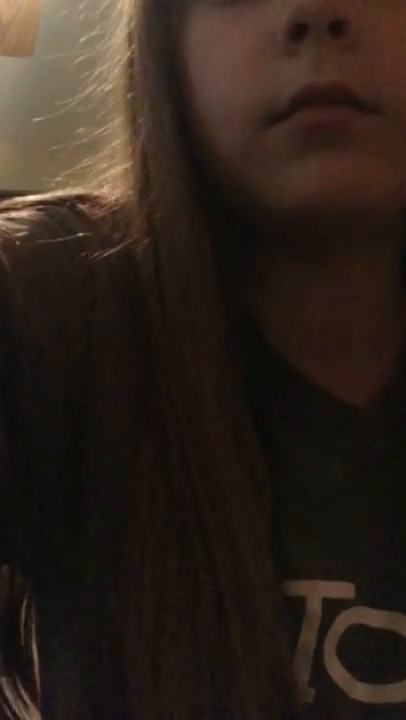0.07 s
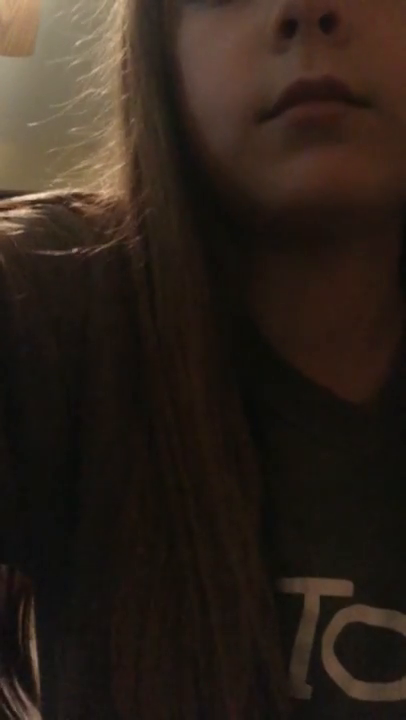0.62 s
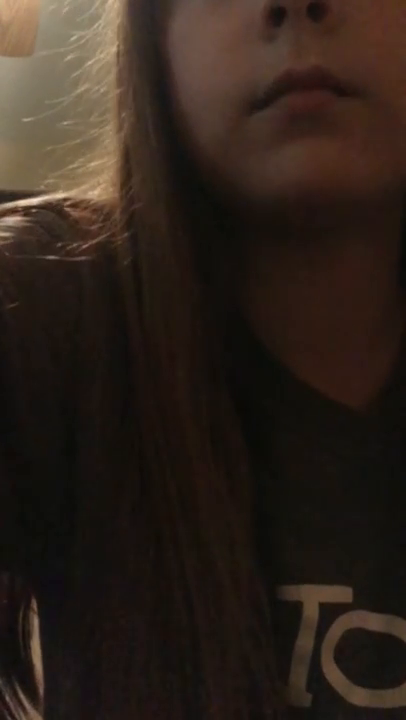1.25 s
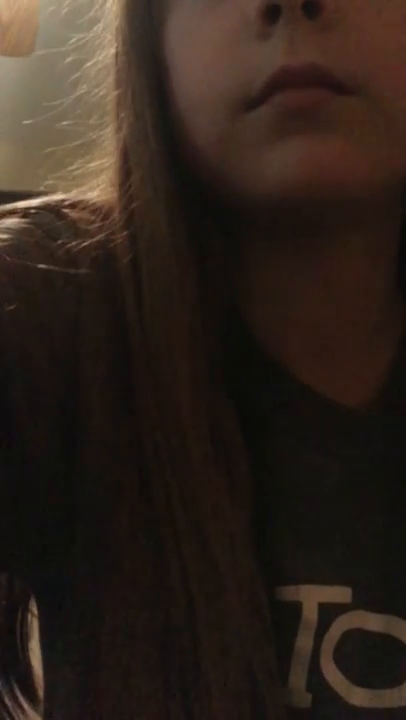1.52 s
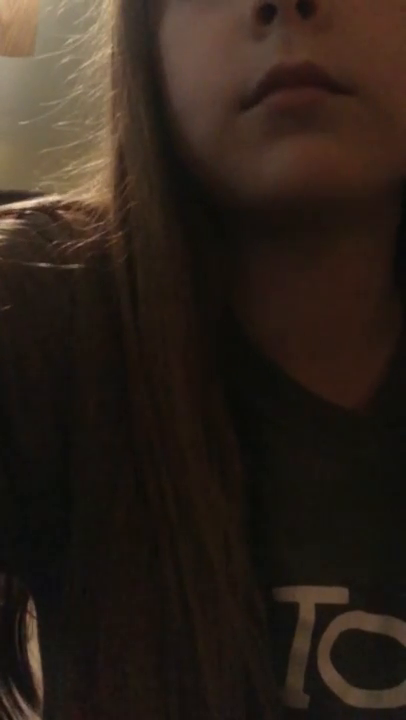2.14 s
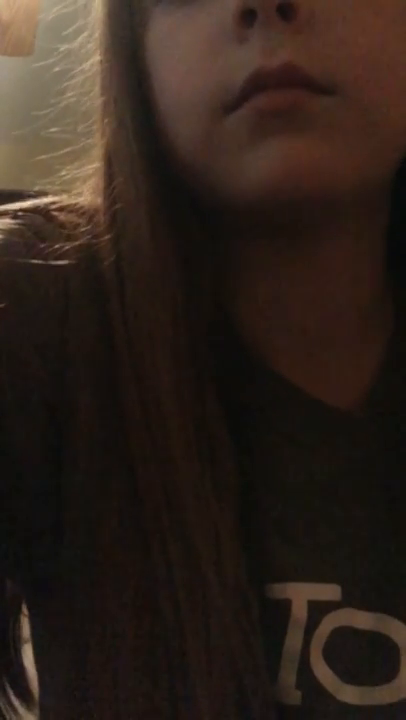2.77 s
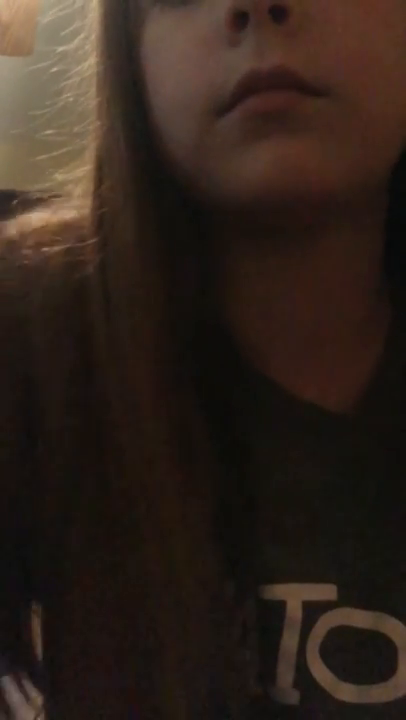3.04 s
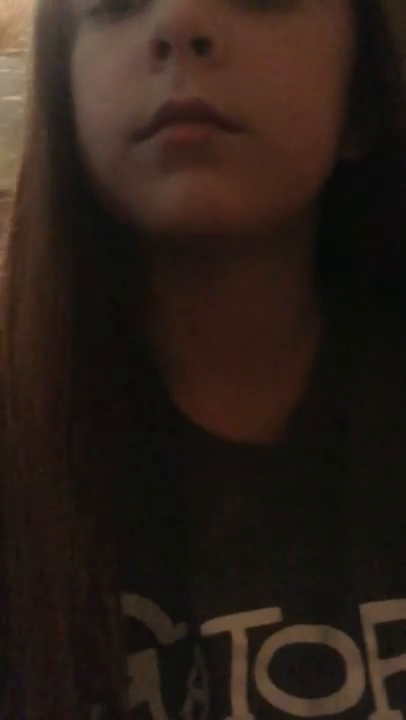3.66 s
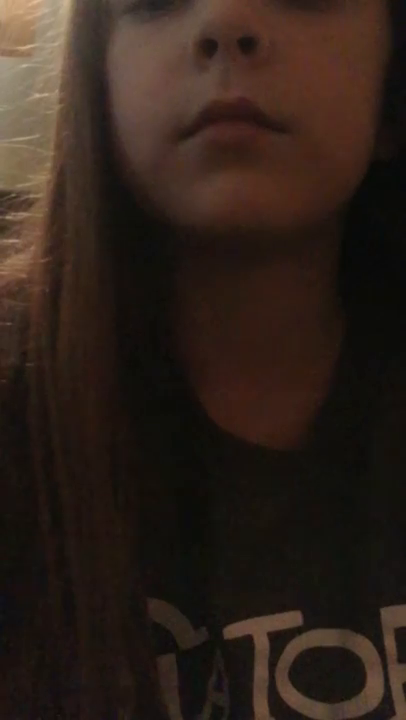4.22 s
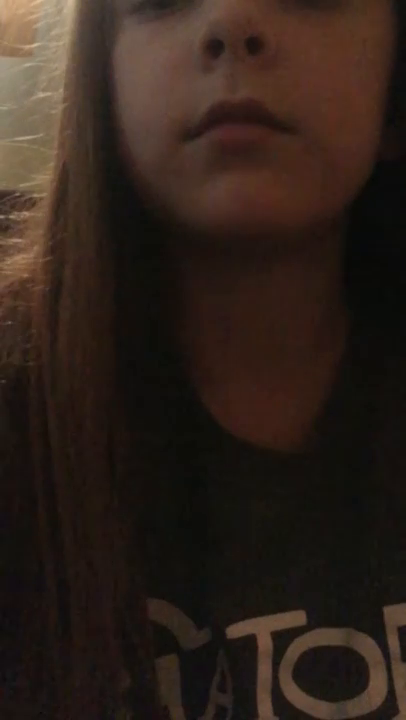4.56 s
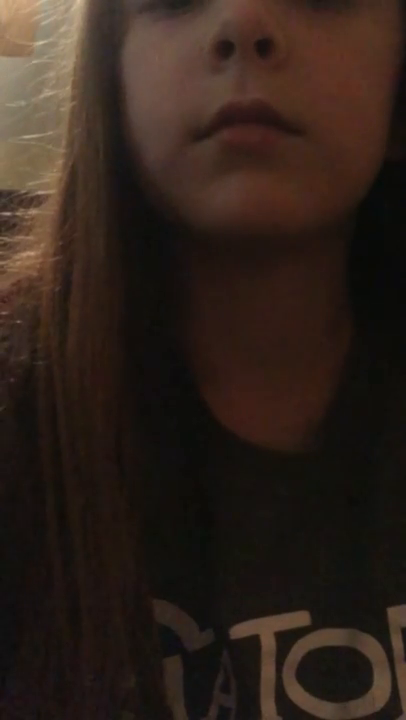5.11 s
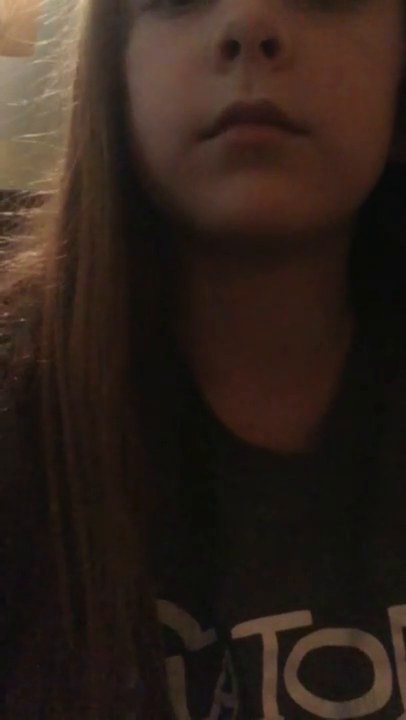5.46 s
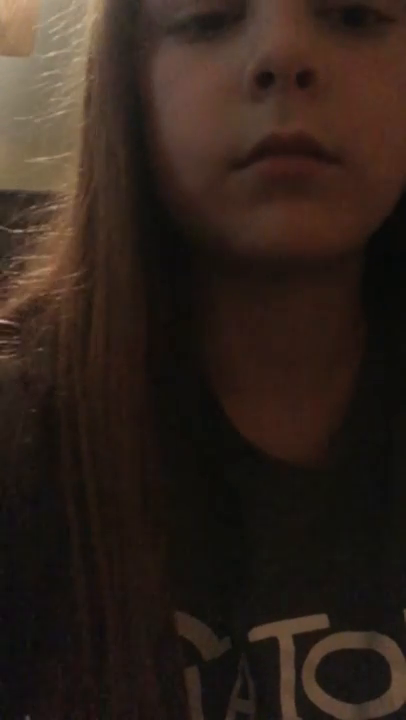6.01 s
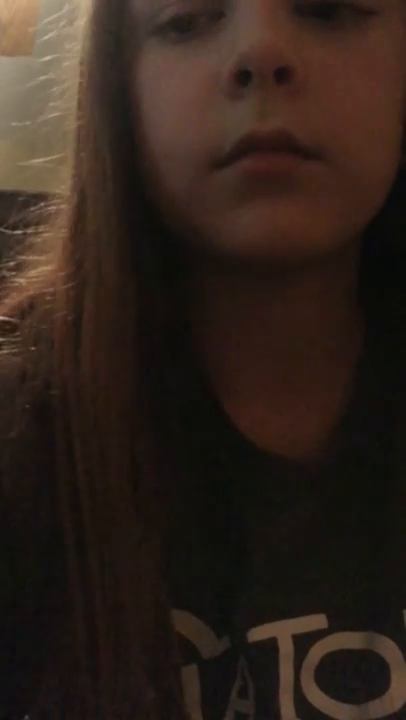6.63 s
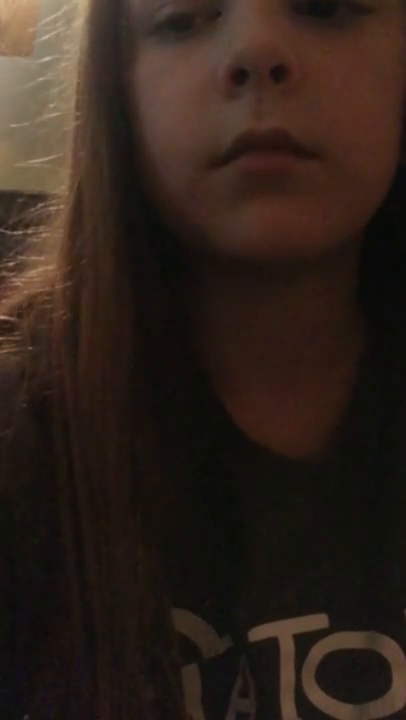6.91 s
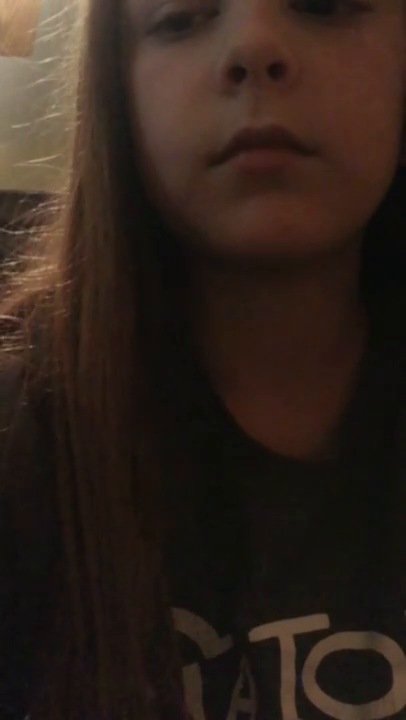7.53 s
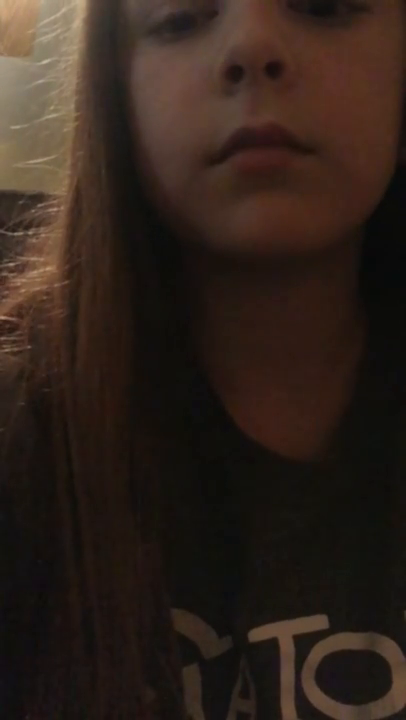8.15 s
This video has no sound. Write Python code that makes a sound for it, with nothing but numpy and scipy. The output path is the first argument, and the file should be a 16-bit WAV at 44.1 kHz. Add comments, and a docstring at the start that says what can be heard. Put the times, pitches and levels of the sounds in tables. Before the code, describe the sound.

A low ventilation hum with a faint airy hiss runs throughout in a small quiet room. From the very start, fingernails tap on the casing that holds the microphone, very close, each tap a dry tick with a slight plastic rattle and a soft low thud. They come in five quick runs of two or three, at about 0, 0.6, 1.3, 1.9 and 2.6 seconds. At 2.8 seconds the hand shifts with a faint scuff. After a pause, a single bright clink sounds at 3.8 seconds as a nail strikes something hard and hollow nearby, like a glass. Quick runs of about three high, briefly ringing clinks follow at roughly 4.4, 5.0 and 5.8 seconds. Lighter runs come at 6.5 and 7.4 seconds, and a firmer last one at around 8 seconds.

```python
"""Fingernails tap in quick runs of two or three in a small quiet room, over a low ventilation hum.
First they hit the casing that holds the microphone: each nail makes a dry tick and shoves the casing
with a thud. The hand shifts with a faint scuff. Then the nails drum on a hard hollow thing nearby,
perhaps a glass, which clinks: many high tones start together and quickly die away."""
import sys
import numpy as np
from scipy import signal
from scipy.fft import rfft, irfft, next_fast_len
from scipy.io import wavfile
from scipy.ndimage import uniform_filter1d

SR = 44100
rng = np.random.default_rng(int(sys.argv[2]) if len(sys.argv) > 2 else 0)


def store_pcm(level_fs):
    """Save levels as 16-bit WAV."""
    pcm = np.round(np.clip(level_fs, -1, 1) * 32767).astype(np.int16)
    wavfile.write(sys.argv[1], SR, np.atleast_2d(pcm).T)


N = 369558

# Levels in the tables are relative: the functions set the final loudness.
# the low rumble and the faint hiss of moving air: f/Hz, level/dB
AIR_RUMBLE = [(12, -60), (20, -35), (53, -6.5), (92, -3.5), (123, -3.5), (146, -4), (181, 0), (217, -4),
              (298, -6), (332, -20), (457, -17.5), (536, -26.5), (607, -21), (700, -30), (1400, -51),
              (1820, -81), (3080, -120)]
AIR_HISS = [(700, 9.5), (1500, -0.5), (2300, 3.5), (3500, -2.5), (5000, -4), (6500, -7.5), (7600, -2.5),
            (8400, 0), (9200, -8.5), (11000, -8.5), (12500, -12.5), (15200, -10), (16000, -43)]
# tones of the fan and the mains power: f/Hz, level/dB
HUM_TONES = [(57, -57), (73, -55.5), (121, -51.5), (144, -58.5), (174, -54.5), (196, -52.5), (213, -64),
             (233, -57), (251, -57), (267, -57), (286, -57.5), (303, -57.5), (447, -71.5), (603, -71.5),
             (969, -86), (1050, -85)]
# slow rise and fall of rumble and hum: t/s, level/dB
AIR_SWELLS = [(0, -39.5), (2.3, -42.5), (2.62, -40), (3.08, -44), (3.72, -40), (4.05, -43.5), (4.5, -39),
              (4.85, -43.5), (5.1, -40), (8.3, -39)]
# nails on the casing: t/s, click level/dB, thud level/dB, thud f/Hz
CASING_HITS = [(0.0015, -23.5, -39.5, 260), (0.0395, -25, -39, 294), (0.5639, -22, -33, 215),
               (0.5897, -20.5, -37, 200), (1.2372, -24.5, -38, 207), (1.314, -27.5, -46.5, 202),
               (1.383, -20, -35.5, 357), (1.901, -29, -36.5, 260), (1.944, -25.5, -45.5, 307),
               (2.0087, -22, -36.5, 234), (2.5521, -23.5, -33, 273), (2.591, -22.5, -41, 292),
               (2.6512, -25.5, -37, 286)]
# tone colour of the nail's tick, the casing's rattle, its thud and the room: f/Hz, level/dB
TICK_SPECTRUM = [(500, -10), (1900, -16), (3200, -12), (5500, 7.5), (7500, 3.5), (9500, 0.5),
                 (12000, -12.5), (13500, -26), (15200, -29), (16200, -44)]
RATTLE_SPECTRUM = [(1000, -20.5), (2000, -17), (3000, -3), (4000, 1.5), (5200, -5.5), (6500, -24),
                   (8500, -13), (12000, -40), (15000, -20)]
THUD_SPECTRUM = [(40, -28), (150, 6.5), (400, 5), (800, 4), (1150, -3.5), (1600, -16.5), (3000, -71),
                 (8000, -60)]
ROOM_SPECTRUM = [(100, 5), (700, 4.5), (1500, 0), (3000, 5), (5000, 1), (8200, -0.5), (9500, -5),
                 (15000, 1.5)]
# fingers brushing the casing: t/s, length/s, level/dB
BRUSHES = [(0.766, 0.0045, -56.5), (2.793, 0.027, -51), (2.812, 0.035, -53), (2.828, 0.11, -65)]
# nails on the glass: t/s, level/dB
GLASS_HITS = [(3.8041, -18), (4.383, -24.5), (4.441, -20.5), (4.5088, -26), (5.021, -22), (5.1004, -23.5),
              (5.1596, -23.5), (5.7745, -36.5), (5.8298, -31.5), (5.9302, -20), (6.4423, -33.5),
              (6.605, -28), (6.7034, -32.5), (7.232, -56), (7.3676, -29), (7.445, -32), (7.962, -28.5),
              (8.0702, -22), (8.1144, -25.5)]
# the glass's strong tones: f/Hz, level/dB (earlier fingers), level/dB (last finger), fade time/s
GLASS_TONES = [(2295, -16, -26, 0.09), (2345, -10, -22, 0.1), (3289, -13, -13, 0.21),
               (3644, -15, -19, 0.29), (3684, -3, -8, 0.16), (3760, -12, -21, 0.23), (4102, -18, -14, 0.26),
               (4335, -17, -12, 0.5), (4420, -7, -2, 0.45), (4557, -12, -8, 0.26), (4817, -10, -13, 0.42),
               (4884, 0, -3, 0.24), (4971, -3, -9, 0.17), (5019, -7, -8, 0.22), (5206, -11, -9, 0.32),
               (6422, -15, -13, 0.18), (6648, -17, -11, 0.23), (6788, -13, -6, 0.15), (6972, -6, -8, 0.15),
               (7253, -7, -2, 0.13), (8000, -17, -13, 0.24), (8172, -12, -13, 0.4), (8274, -12, -12, 0.48),
               (8370, -10, -9, 0.17), (9331, -12, -8, 0.16), (10125, -2, -3, 0.13), (10215, -9, -9, 0.14),
               (10500, -11, -9, 0.12), (10605, -6, -9, 0.14), (11145, -8, -3, 0.12),
               (12615, -16, -14, 0.12)]
# tone colour of its many weaker tones: f/Hz, level/dB
GLASS_SPECTRUM = [(1500, -25.5), (2900, -20.5), (3500, -1.5), (4150, -6), (4500, -4), (5050, -1.5),
                  (5600, -7), (7200, -2), (8800, -3), (11000, 0.5), (11800, -14.5), (13100, -8.5),
                  (14200, -20), (15500, -29)]

RUN_GAP_S = 0.3  # a longer pause starts a new run of taps


def undb(db):
    """Turn decibels into a number to multiply by."""
    return 10 ** (np.asarray(db) / 20)


def unit(x):
    """Scale a sound to an average power of 1."""
    return x / np.sqrt(np.mean(x ** 2))


def curve_db(points, hz):
    """Read the level between a spectrum's points, spacing octaves evenly."""
    f, db = np.transpose(points)
    return np.interp(np.log(np.maximum(hz, 1)), np.log(f), db)


def colour(x, points, size=2048):
    """Filter a sound so that each pitch is turned up or down as the points say."""
    cepstrum = irfft(np.log(undb(curve_db(points, np.fft.rfftfreq(size, 1 / SR)))))
    # folding onto the first half keeps the filter from sounding before a hit
    cepstrum[1:size // 2] *= 2
    cepstrum[size // 2 + 1:] = 0
    return signal.fftconvolve(x, irfft(np.exp(rfft(cepstrum))))[:len(x)]


def noise(points):
    """Steady noise with the given tone colour."""
    gain = undb(curve_db(points, np.fft.rfftfreq(N, 1 / SR)))
    return unit(irfft(rfft(rng.standard_normal(N)) * gain, N))


def drift(rate_hz):
    """Glide between random values, rate_hz of them a second."""
    step = int(SR / rate_hz)
    stairs = np.repeat(rng.standard_normal(N // step + 1), step)
    return unit(uniform_filter1d(stairs, step)[:N])


def fade(t, t60):
    """Die away, falling 60 dB in t60 seconds."""
    return np.exp(-np.log(1000) * t / t60)


def fading_tones(t, hz, t60):
    """One fading tone per row, each starting at a random point in its wave."""
    return fade(t, t60[:, None]) * np.sin(2 * np.pi * (hz[:, None] * t + rng.random((len(hz), 1))))


def add(track, s, sound):
    """Mix a sound into the track at s seconds."""
    i = max(int(s * SR), 0)
    track[i:i + len(sound)] += sound[:max(N - i, 0)]


def disperse(x, lag_s):
    """Low pitches travel slower in a bending wall: 4 kHz comes lag_s late, the top almost at once."""
    size = next_fast_len(len(x) + SR // 20)
    hz = np.fft.rfftfreq(size, 1 / SR)
    delay_s = 2 * lag_s / (1 + (hz / 4000) ** 4)
    phase = 2 * np.pi * np.cumsum(delay_s) * SR / size
    return irfft(rfft(x, size) * np.exp(-1j * phase), size)[:len(x)]


def fingers(taps):
    """Each tap's place in its run, counted from 0."""
    places = [0]
    for gap in np.diff(np.transpose(taps)[0]):
        places.append(0 if gap > RUN_GAP_S else places[-1] + 1)
    return np.array(places)


def ventilation(rumble_db=-45, hum_db=-1, hiss_db=-66, whine_db=-88, swell_db=2):
    """Air rumbles and hisses, fan and mains hum unsteadily, and a thin electrical whine sits on top."""
    t = np.arange(N) / SR
    hum = 0
    for hz, tone_db in HUM_TONES:
        waver = (1 + drift(9) + 1j * drift(9)) * undb(swell_db * drift(3))  # in loudness and phase
        tone = np.exp(2j * np.pi * (hz * t + rng.random()))
        hum += undb(tone_db) * unit(np.real(waver * tone))
    rest, rumble = noise(AIR_RUMBLE), 0
    for edge_hz in (90, 160, 230, 330):  # each low band swells on its own
        band = signal.sosfiltfilt(signal.butter(6, edge_hz, fs=SR, output="sos"), rest)
        rumble += band * unit(undb(swell_db * drift(6)))
        rest = rest - band
    times, db = np.transpose(AIR_SWELLS)
    level = undb(np.interp(t, times, db - np.mean(db)) + 1.66 * drift(12))
    low = undb(rumble_db) * (rumble * level + rest) + undb(hum_db) * hum * level
    whine = undb(whine_db) * np.sin(2 * np.pi * 14290 * t)
    return low + undb(hiss_db) * noise(AIR_HISS) + whine


def casing_taps(tick_db=1, rattle_db=-2, thud_boost_db=13, thud_cycles=2.7, lag_s=0.000916):
    """Each nail makes a sharp tick, a short plastic rattle and a quick shove of the whole casing."""
    out, t = np.zeros(N), np.arange(SR // 12) / SR
    usual_db = np.mean(CASING_HITS, axis=0)[1]
    for (s, click_db, thud_db, thud_hz), finger in zip(CASING_HITS, fingers(CASING_HITS)):
        # the nail's edge grates for an instant as it lands
        contact = (t == 0) + 0.13 * rng.standard_normal(len(t)) * fade(t, t60=0.0072)
        tick = disperse(colour(contact, TICK_SPECTRUM), lag_s=0.0012)
        rattle = colour(rng.standard_normal(len(t)) * fade(t, t60=0.037), RATTLE_SPECTRUM)
        click = 2 * undb(tick_db) * tick / np.linalg.norm(tick)
        click += 2 * undb(rattle_db) * rattle / np.linalg.norm(rattle)
        treble_db = 1.04 * (click_db - usual_db)  # harder taps are brighter
        click = colour(click, [(5000, 0), (11000, treble_db)])
        shove = -np.cos(2 * np.pi * thud_hz * t) * fade(t, thud_cycles / thud_hz)
        # flesh gives a round thud, bare nail a knock; each later finger knocks harder
        knock_db = -4.5 + 5.5 * finger
        thud = colour(colour(shove, THUD_SPECTRUM), [(350, 0), (1000, knock_db)])
        add(out, s + lag_s, undb(click_db) * click + undb(thud_db + thud_boost_db) * thud)
    return out


def room_echoes(x, tail_db=-14, body_db=-22, wall_db=-23):
    """Sound bounces off the body and a wall, then fades in a short soft tail."""
    t = np.arange(SR // 2) / SR
    tail = rng.standard_normal(len(t)) * fade(t, t60=0.46) * (1 - np.exp(-t / 0.002))
    response = undb(tail_db) * tail / np.linalg.norm(tail)
    for delay_s, db in ((0.009, body_db), (0.027, wall_db)):
        echo = rng.standard_normal(SR // 50) * fade(t[:SR // 50], t60=0.025)
        add(response, delay_s, undb(db) * echo / np.linalg.norm(echo))
    return signal.fftconvolve(colour(x, ROOM_SPECTRUM), response)[:N]


def scuffs():
    """Skin and nail slide over the casing in a spray of tiny slips."""
    slips = rng.standard_normal(N) * undb(6 * rng.standard_normal(N))
    grit = colour(slips, [(1200, -12), (3300, -4), (6000, -7), (8500, -4.5), (12200, -14), (15000, -26)])
    loudness = np.zeros(N)
    for s, length_s, db in BRUSHES:
        add(loudness, s, undb(db) * np.hanning(int(length_s * SR)))
    return loudness * unit(grit)


def glass_taps(level_db=-10, weak_db=-2, crack_db=-3, scatter_db=3, extra_fade_t60=2, weak_count=320):
    """Every nail rings the same tones of the glass, in a mix that depends on where it lands."""
    out, t = np.zeros(N), np.arange(SR * 2 // 5) / SR
    hz, earlier_db, last_db, tone_t60 = np.transpose(GLASS_TONES)
    # the glass's tones fade a little faster; the room's echo lengthens them again
    t60 = 1 / (1 / tone_t60 + 1 / extra_fade_t60)
    weak_hz = np.geomspace(1600, 15500, weak_count) * (1 + 0.003 * rng.standard_normal(weak_count))
    weak_gain = undb(curve_db(GLASS_SPECTRUM, weak_hz)) * np.sqrt(weak_hz)
    weak_tones = fading_tones(t, weak_hz, t60=np.interp(weak_hz, [5000, 12000], [0.16, 0.11]))
    times, levels_db = np.transpose(GLASS_HITS)
    ends_run = np.diff(times, append=np.inf) > RUN_GAP_S
    for (s, tap_db), finger, last in zip(GLASS_HITS, fingers(GLASS_HITS), ends_run):
        # the last finger lands on another spot: less low knock, more of the long ring
        mix_db = (last_db if last else earlier_db) + scatter_db * rng.standard_normal(len(hz))
        strong = undb(mix_db) @ fading_tones(t, hz, t60)
        weak = (weak_gain * rng.standard_normal(weak_count)) @ weak_tones
        crack = colour(rng.standard_normal(len(t)), GLASS_SPECTRUM) * fade(t, t60=0.14)
        clink = unit(strong) + undb(weak_db) * unit(weak) + undb(crack_db) * unit(crack)
        # harder taps are brighter; each later finger is duller
        treble_db = 0.7 * (tap_db - np.mean(levels_db)) - 0.86 - 0.6 * finger
        clink = colour(clink, [(4800, 0), (8000, treble_db), (14000, 1.1 * treble_db)])
        clink *= undb(tap_db + level_db) / np.std(clink[:SR // 80])
        clink *= 1 - np.exp(-t / 0.0012)  # soften the very start
        add(out, s, disperse(clink, lag_s=0.002))
    return out


def scene():
    """Taps, scuffs and their echoes over the hum, in one channel."""
    hand = casing_taps() + scuffs() + glass_taps()
    return (hand + room_echoes(hand) + ventilation())[None]


def record(dry, top_hz=16200):
    """The very highest pitches, above about 16 kHz, are cut off."""
    return signal.sosfilt(signal.ellip(12, 0.2, 70, top_hz, fs=SR, output="sos"), dry)


dry = scene()
out = record(dry)
store_pcm(out)
```